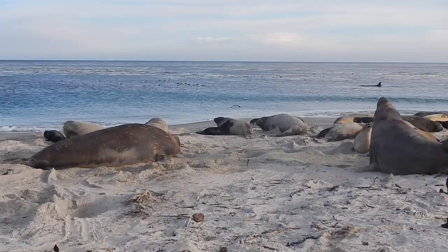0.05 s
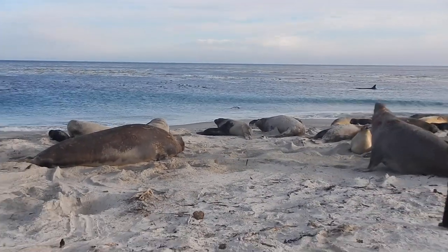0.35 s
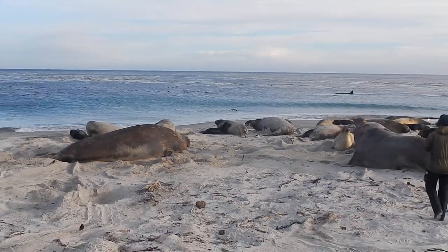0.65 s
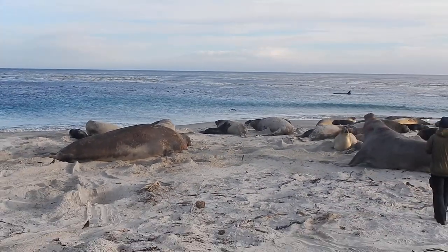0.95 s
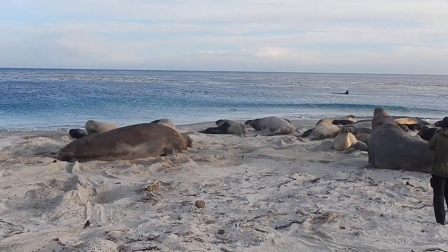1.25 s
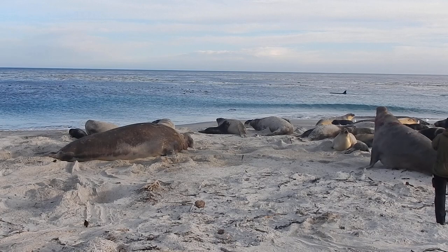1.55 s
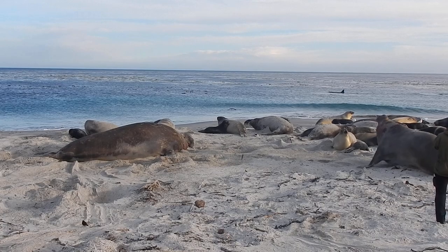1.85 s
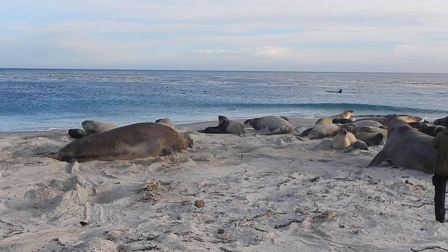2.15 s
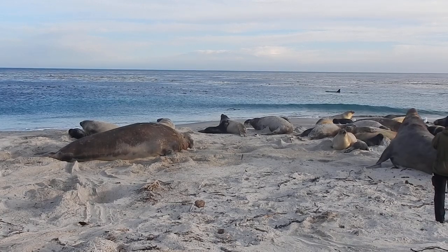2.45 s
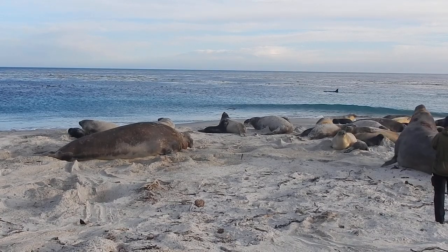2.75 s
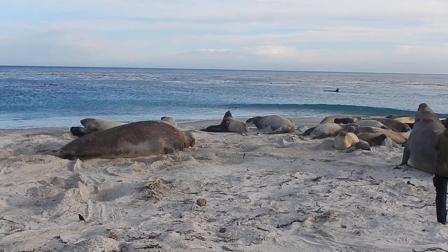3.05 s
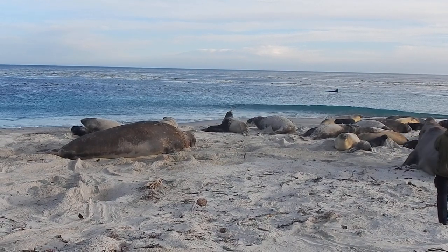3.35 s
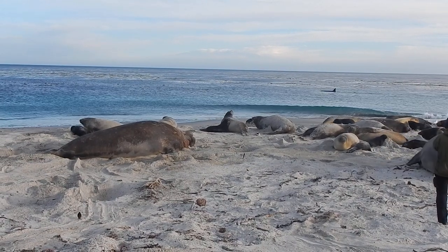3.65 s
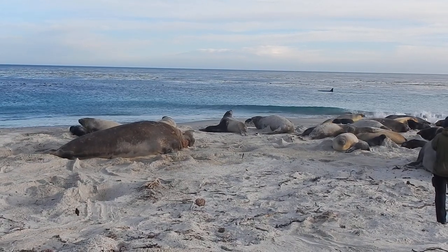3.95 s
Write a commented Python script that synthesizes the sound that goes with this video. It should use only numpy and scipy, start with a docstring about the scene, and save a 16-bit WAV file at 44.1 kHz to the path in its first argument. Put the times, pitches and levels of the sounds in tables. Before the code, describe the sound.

A nearby elephant seal snorts a run of rattling pulses from about 0.3 seconds, then roars roughly from 1.2 to 2.2 seconds, a low clear tone emerging near the end. From 2.5 seconds, farther seals rasp and give two runs of low, rising knocking calls, with small gritty crunches around 3.5 seconds. Soft surf hisses throughout, swelling at the close, and wind buffets the microphone.

```python
"""An elephant seal on an open beach snorts a run of rattling pulses, then roars. Loose throat tissue
flaps unevenly and chops the breath; chest, throat and mouth filter this source, over a low voiced
tone that comes out clean near the end. Farther seals rasp and give low knocking calls, among small
crunches. Surf hisses behind and wind buffets the microphone."""
import sys
import numpy as np
from scipy import signal
from scipy.fft import rfft, irfft
from scipy.io import wavfile
from scipy.ndimage import uniform_filter1d

SR = 44100
rng = np.random.default_rng(int(sys.argv[2]) if len(sys.argv) > 2 else 0)


def store_wav(level_fs):
    """Save 16-bit WAV to argv[1]."""
    pcm = np.round(np.clip(np.atleast_2d(level_fs), -1, 1) * 32767)
    wavfile.write(sys.argv[1], SR, pcm.T.astype(np.int16))


N = 176400
T = np.arange(N) / SR


def from_db(db):
    """Amplitude ratio of a level in decibels."""
    return 10 ** (np.asarray(db) / 20)


def rms_one(x):
    """Normalisation to unit rms."""
    return x / np.sqrt(np.mean(x ** 2) + 1e-20)


def even(x):
    """Division by the running rms holds the level steady over about 40 ms."""
    return x / np.sqrt(np.abs(uniform_filter1d(x * x, size=1800)) + 1e-9)


def in_time(rows):
    """Linear interpolation of each column against the first, t/s."""
    times, *columns = np.transpose(rows)
    return [np.interp(T, times, column) for column in columns]


def swells(rows, edge_s):
    """Sum of trapezoidal envelopes, one per row."""
    return sum(from_db(db) * np.clip(np.minimum(T - s, s + length - T) / edge_s + .5, 0, 1)
               for s, length, db in rows)


def add(out, start_s, x):
    """Superposition of a short sound from a given instant."""
    i = int(start_s * SR)
    out[i:i + len(x)] += x[:N - i]


def drift(hz):
    """Random fluctuation: low-passed noise of unit rms."""
    r = np.exp(-2 * np.pi * hz / SR)
    return rms_one(signal.lfilter([1], [1, -2 * r, r * r], rng.standard_normal(N + SR))[SR:])


def colour(x, spectrum):
    """Spectral shaping by a gain curve interpolated in log frequency."""
    hz, db = np.transpose(spectrum)
    f = np.arange(N // 2 + 1) * SR / N
    return irfft(rfft(x) * from_db(np.interp(np.log(f + 1), np.log(hz), db)), N)


def noise(spectrum, correlation):
    """Partially coherent stereo noise of unit rms."""
    mid, side = colour(rng.standard_normal((2, N)), spectrum)
    return rms_one(np.sqrt(1 + correlation) * mid + np.sqrt(1 - correlation) * side * [[1], [-1]])


def soften(x, hz):
    """Low-pass filtering, as by soft flesh."""
    return signal.sosfilt(signal.butter(4, hz, fs=SR, output="sos"), x)


def resonate(x, hz, width_hz):
    """A damped resonator with unit peak gain."""
    r = np.exp(-np.pi * width_hz / SR)
    poles = [1, -2 * r * np.cos(2 * np.pi * hz / SR), r * r]
    return signal.lfilter(np.array([1, 0, -1]) * (1 - r * r) / 2, poles, x + 1e-18)


def bank(x, modes):
    """Modal superposition with alternating signs."""
    return sum((-1) ** k * from_db(db) * resonate(x, hz, width)
               for k, (hz, width, db) in enumerate(modes))


def steep_bank(x, modes):
    """Cascaded resonator pairs in parallel leave deep valleys between modes; unit rms."""
    return rms_one(sum(from_db(db) * resonate(resonate(x, hz, width), hz, width)
                       for hz, width, db in modes))


def formant(x, path, width_hz):
    """A moving resonance by heterodyning: shift down, low-pass, shift back; unit rms."""
    carrier = np.exp(2j * np.pi * np.cumsum(in_time(path)[0]) / SR)
    r = np.exp(-np.pi * width_hz / SR)
    return rms_one((signal.lfilter([1], [1, -2 * r, r * r], x / carrier) * carrier).real)


def snap(grit, fade_s):
    """Impulsive excitation, as when tissue slaps shut: a click with a decaying noise tail."""
    t = T[:SR // 10]
    return (t == 0) + grit * rng.standard_normal(len(t)) * np.exp(-t / fade_s)


def pop(hz, ring_s):
    """Damped oscillation of a cavity whose pitch rises as it opens."""
    t = T[:SR // 10]
    pitch = hz * (1 - 0.067 * np.exp(-t / 0.0024))
    return np.sin(2 * np.pi * np.cumsum(pitch) / SR) * np.exp(-t / ring_s)


def flaps(hz):
    """Irregular oscillation of tissue: a click each cycle, and an opening that closes exponentially."""
    jitter, stumble, spread_db, close_s = .13, .2, 1, 0.0053
    rate = hz * np.exp(jitter * drift(60) + stumble * drift(150.9))
    cycles = np.floor(np.cumsum(rate) / SR)
    clicks = np.diff(cycles, prepend=0) * from_db(spread_db * np.clip(rng.standard_normal(N), -2, 2))
    opening = signal.lfilter([1], [1, -np.exp(-1 / (close_s * SR))], clicks)
    return rms_one(clicks), rms_one(opening)


def beach(x, pan_db):
    """Scattering from sand and bodies adds a short tail, different in each ear, to the direct sound."""
    # scattering response: f/Hz, gain/dB
    spectrum = [(100, -26), (500, 7.5), (1000, -9.5), (2200, 7.5), (4300, 5), (8000, 18)]
    decay_s = 0.013
    tail = colour(rng.standard_normal((2, N)) * np.exp(-T / decay_s), spectrum)[:, :SR // 4]
    tail = tail / np.sqrt(decay_s * SR / 2)
    scattered = from_db(-13.5) * signal.fftconvolve(x[None], tail, axes=1)[:, :N]
    return (x + scattered) * from_db(np.array([[1], [-1]]) * pan_db / 2)


def surf():
    """Small waves wash the shore as amplitude-modulated noise, over a faint steady hiss."""
    # spectra of wash and hiss: f/Hz, relative level/dB
    wash_spectrum = [(60, 5.5), (250, 4), (500, -7), (1000, -10.5), (2200, -15.5), (3200, -21),
                     (4300, -15.5), (5300, -28.5), (6300, -25), (7500, -43.5), (9500, -46), (15000, -44)]
    hiss_spectrum = [(1000, -14), (7000, 1), (11000, -2), (15500, -5)]
    # the wash ebbs, then swells: t/s, relative level/dB
    ebb = [(0, -50.5), (.3, -51.5), (.9, -53.5)]
    swell = [(2.16, -56), (2.472, -55.5), (2.876, -56), (3.368, -57), (3.446, -49.5), (3.574, -46),
             (3.614, -51.5), (4.0, -48)]
    wash_db = 14.5 + in_time(list(ebb) + list(swell))[0] + 2 * drift(45)
    wash = from_db(wash_db) * noise(wash_spectrum, correlation=0.78)
    return wash + from_db(-67) * noise(hiss_spectrum, correlation=0.067)


def wind():
    """Turbulent pressure on the microphone: a lumpy rumble with short, harder buffets."""
    # spectra of rumble and buffets: f/Hz, relative level/dB
    rumble_spectrum = [(20, -13.5), (55, 0), (115, 1), (180, -5), (250, -17.5), (400, -32.5), (800, -40),
                       (3000, -84)]
    buffet_spectrum = [(30, -70), (80, 0.5), (150, -1.5), (220, 0.5), (350, -11.5), (700, -28), (3000, -72)]
    # rumble envelope: t/s, relative level/dB
    gusts = [(0.0, -16.5), (0.14, -37.5), (0.18, -18.5), (0.27, -33), (0.33, -23.5), (0.5, -34.5),
             (0.61, -25.5), (0.85, -49), (0.91, -26), (1.06, -40), (1.11, -26), (1.63, -36), (1.69, -26),
             (1.79, -39), (2.06, -25), (2.13, -35.5), (2.21, -24), (2.61, -41), (2.68, -26.5),
             (2.73, -37.5), (3.73, -33.5), (4.0, -36)]
    # buffets: t/s, duration/s, level/dB
    buffets = [(.165, 0.036, -18), (.36, 0.02, -21.5), (.94, 0.0097, -24), (1.11, 0.034, -22),
               (2.185, 0.059, -22.5), (2.66, 0.035, -33.5), (2.858, 0.011, -27), (3.19, 0.03, -32.5),
               (3.705, 0.011, -23)]
    rumble = from_db(4 + in_time(gusts)[0] + 2 * drift(35)) * noise(rumble_spectrum, correlation=.1)
    return rumble + swells(buffets, edge_s=0.0044) * even(noise(buffet_spectrum, correlation=0.56))


def crunches():
    """Impulses ring damped resonances: gritty ticks, probably sand and dry weed under a moving seal."""
    # ticks: t/s, relative level/dB, f/Hz
    ticks = [(2.876, -32.5, 4300), (3.459, -26.5, 4300), (3.588, -26.5, 4200), (3.611, -26, 3830),
             (3.67, -26, 4300), (3.691, -23, 2620), (3.748, -28, 4200), (3.773, -25.5, 3880),
             (3.784, -23.5, 2720)]
    out = np.zeros(N)
    for s, db, hz in ticks:
        add(out, s, from_db(db + 19.5) * resonate(snap(grit=0.34, fade_s=0.0024), hz, width_hz=540))
    return soften(out, hz=5430)


def far_knocks():
    """Impulses excite throat, chest and mouth of farther seals, which ring on as the calls rise."""
    # knocks: t/s, relative level/dB, throat f/Hz, overtone gain/dB
    knocks = [(2.713, -24.5, 313, 6), (2.72, -23.5, 294, 0), (2.739, -19, 340, -23), (2.761, -17, 352, -26),
              (2.785, -19, 383, -9), (2.81, -21, 400, -0.5), (2.836, -25.5, 386, -15), (2.93, -34, 470, 6),
              (3.001, -33.5, 520, 1), (3.072, -36, 516, 7), (3.479, -26, 284, 9), (3.486, -21.5, 278, -2),
              (3.502, -24.5, 280, 4), (3.511, -23, 292, 0), (3.522, -20, 280, -4), (3.536, -30, 300, 13),
              (3.551, -24, 313, 0), (3.568, -23, 323, 9), (3.588, -15, 325, -18), (3.61, -21.5, 363, 3),
              (3.638, -21.5, 394, -1), (3.660, -26, 450, -7), (3.672, -28.5, 443, 11), (3.69, -42, 467, 23),
              (3.712, -19, 458, 0.5), (3.745, -28, 460, 9), (3.761, -25, 447, 3), (3.786, -38, 458, 6),
              (3.827, -34.5, 497, 19), (3.862, -38, 490, 3)]
    # modes of the overtones and the dull thump: f/Hz, bandwidth/Hz, gain/dB
    overtone_modes = [(1070, 130, -10), (1854, 190, -4.5), (1990, 800, -10), (4200, 410, -31)]
    thump_modes = [(240, 260, 0)]
    # mouth resonance: t/s, f/Hz
    mouth_path = [(2.72, 950), (2.81, 1054), (2.92, 1050), (3.08, 1130), (3.48, 900)]
    out, hits = np.zeros(N), np.zeros(N)
    for s, db, hz, overtones_db in knocks:
        hit = from_db(db + 35.5) * snap(grit=0.099, fade_s=0.005)
        throat = soften(resonate(hit, hz, width_hz=66) + resonate(hit, hz, width_hz=13), hz=900)
        chest = from_db(3.5) * resonate(hit, hz=232, width_hz=18)
        thump = bank(soften(hit, hz=396), thump_modes)
        overtones = from_db(overtones_db) * .5 * bank(hit, overtone_modes)
        add(out, s, throat + chest + thump + overtones)
        add(hits, s, hit)
    hum = from_db(-60) * formant(hits, mouth_path, width_hz=60)
    return soften(out, hz=3200) + hum


def far_rasps():
    """Flapping tissue modulates the breath noise of farther seals, and fixed formants filter it."""
    # rasps: t/s, duration/s, level/dB
    rasps = [(2.465, 0.088, -39.5), (2.7, 0.15, -45), (3.47, 0.152, -44.5), (3.66, 0.28, -47)]
    # formants: f/Hz, bandwidth/Hz, gain/dB
    modes = [(970, 420, 4), (1830, 320, 2), (4200, 460, -8.5)]
    _, opening = flaps(hz=110)
    return swells(rasps, edge_s=0.057) * steep_bank(opening * rng.standard_normal(N), modes)


def snorts():
    """Impulse responses of nose and throat: each pulse rings both inside a puff of escaping air."""
    # pulses: t/s, relative level/dB, nasal f/Hz, throat gain/dB, air gain/dB
    pulses = [(.329, -15.5, 1356, -14, -4.5), (.354, -13, 1436, -26, -9.5),
              (.412, -7.5, 1320, -12.5, -11.5), (0.432, -12, 1310, -10, -4), (0.45, -32, 1280, -10, 8.5),
              (.496, -18, 1160, -1.5, -3), (0.512, -22, 1176, -5, -1), (0.541, -26, 1120, 12, 6),
              (0.581, -22.5, 1060, 9.5, 10), (.628, -13.5, 1140, -11, -2.5), (0.685, -16, 1100, 2.5, 1.5),
              (0.737, -16.5, 1150, -1.5, 0), (0.798, -9, 1180, -14, -6), (.848, -26, 1550, -25, -1.5),
              (.877, -27.5, 1470, -14, -1), (0.901, -26, 1480, -14, 1.5), (0.991, -19.5, 1090, -26, -11),
              (1.004, -19, 944, -2, -16), (1.010, -12, 1000, -25, -23), (1.032, -17, 1010, -4.5, -3),
              (1.034, -18, 990, -37, -19), (1.041, -14, 930, -19.5, -36), (1.059, -11, 1107, -32, -26),
              (1.119, -26, 1080, -20, -3.5), (1.170, -19, 2110, -11, -2), (1.204, -19, 1970, -15, -0.5),
              (1.220, -25, 1600, -15, -14), (1.232, -12, 1140, -6, -25), (1.243, -13, 986, -10, -12)]
    # upper resonances: f/Hz, bandwidth/Hz, gain/dB
    overtone_modes = [(1528, 83, 5.5), (2130, 230, -2.5), (4300, 200, -5.5), (6250, 720, -25)]
    # escaping air: f/Hz, relative level/dB
    air_spectrum = [(200, 3), (500, 0), (800, -4.5), (1200, 7.5), (2300, -10), (3200, -5.5), (4300, 6.5),
                    (5200, -12), (6400, -13), (8500, -41), (14000, -45)]
    rise_s, fade_s = 0.0038, 0.0033
    rings, puffs = np.zeros(N), np.zeros(N)
    for s, db, hz, throat_db, air_db in pulses:
        nose = from_db(-1) * pop(hz, ring_s=0.0043)
        overtones = from_db(21.5) * bank(snap(grit=0.094, fade_s=0.0019), overtone_modes)
        throat = from_db(throat_db) * pop(hz=547, ring_s=.004)
        add(rings, s, from_db(db) * (nose + overtones + throat))
        puffs += from_db(db + air_db) * np.exp(-np.maximum((s - T) / rise_s, (T - s) / fade_s))
    _, opening = flaps(hz=140)
    air = rms_one(colour(rng.standard_normal(N) * (.5 + opening), air_spectrum))
    return soften(rings, hz=8100) + from_db(-4) * puffs * air


def span(rows):
    """Rectangular window from the first row's time to the last's."""
    return (T > rows[0][0]) * (T < rows[-1][0])


def voice(opening):
    """The roar's voiced tone: a harmonic series, rough where the flaps modulate its amplitude."""
    # contour: t/s, f/Hz, relative level/dB, roughness (0-1)
    contour = [(1.28, 169.3, -38, 0.72), (1.32, 176.1, -24, 0.13), (1.42, 178.9, -25.5, 0.26),
               (1.5, 205.3, -40, 0.56), (1.7, 208.2, -27, 0.36), (1.82, 219.3, -29.5, 0.15),
               (1.87, 205.5, -18.5, 0.03), (1.94, 197.4, -15.5, 0), (1.975, 172.7, -16, 0),
               (2.005, 172, -16, 0.07), (2.03, 171, -30, 0.32)]
    # harmonics from the fundamental up: gain/dB
    harmonics = [3.5, -7, -2, -3, -10, -17]
    # overtone emphasis: t/s, gain/dB
    brightness = [(1.3, 0), (1.8, 1), (1.87, 3), (1.95, -3.5), (1.98, -33)]
    hz, db, roughness = in_time(contour)
    wobble = 0.0123 * (1 + roughness) * drift(55)
    phase = 2 * np.pi * np.cumsum(hz * (1 + wobble)) / SR
    bright = from_db(in_time(brightness)[0])
    tone = sum(from_db(h) * (bright if k else 1) * np.sin((k + 1) * phase + rng.uniform(0, 2 * np.pi))
               for k, h in enumerate(harmonics))
    return tone * from_db(db) * (1 + roughness * (opening - opening.mean())) * span(contour)


def roar():
    """Source and filter: flaps and the air they chop drive chest, throat, mouth and a bright rasp."""
    # envelopes: t/s, then relative level/dB of throat, mouth and rasp
    levels = [(1.2, -47, -44, -57), (1.258, -23, -20.5, -25.5), (1.34, -17.5, -18, -25.5),
              (1.396, -20, -19, -21.5), (1.482, -15.5, -22, -20), (1.51, -22.5, -25, -27.5),
              (1.542, -17, -19.5, -25.5), (1.67, -21, -25, -28.5), (1.706, -14.5, -22.5, -24),
              (1.732, -17.5, -20.5, -29), (1.78, -20, -26, -31.5), (1.89, -19.5, -24, -30),
              (1.994, -18, -29, -29.5), (2.064, -13.5, -24.5, -30.5), (2.11, -30.5, -34, -28),
              (2.17, -60, -65, -68)]
    # opening flutter, narrow core of the throat resonance, top hiss: t/s, relative level/dB
    flutter_level = [(1.06, -54), (1.09, -37.5), (1.13, -39), (1.19, -46), (1.24, -60)]
    core_level = [(1.25, -11), (1.42, -11), (1.48, -2), (1.7, -11), (1.8, -18), (1.88, -5.5), (2.05, -13)]
    hiss_level = [(1.2, -71), (1.27, -41.5), (1.44, -35), (1.6, -41), (1.72, -37), (1.8, -42), (1.9, -34),
                  (2.11, -42.5), (2.17, -82)]
    # nominal flap rate and two moving formants: t/s, f/Hz
    flap_rate = [(1.08, 100.6), (1.21, 71.94), (1.26, 120.3), (1.45, 125), (1.56, 95.25), (1.7, 83.68),
                 (1.8, 65.8), (1.86, 103), (1.95, 98.8), (2.03, 110.3), (2.1, 91.84)]
    throat_path = [(1.25, 529), (1.48, 494), (1.6, 504), (1.8, 476), (1.9, 552), (2.08, 524)]
    mouth_path = [(1.25, 955), (1.4, 932), (1.56, 887), (1.75, 865), (2.08, 856.7)]
    # fixed resonances: f/Hz, bandwidth/Hz, gain/dB
    chest_modes = [(211.5, 134, 0.5), (302, 113, 0), (435, 155, -4.5)]
    upper_modes = [(1210, 110, 3), (1660, 370, 4), (2180, 290, 3.5), (2680, 650, -3)]
    rasp_modes = [(3760, 280, 5.5), (4180, 456, 8), (6100, 270, -29)]
    # top hiss: f/Hz, gain/dB
    hiss_spectrum = [(3000, -48), (4800, -37), (5600, 9), (6500, 2.5), (7200, -6.5), (8200, -12.5),
                     (9200, -19.5), (13500, -25.5), (15000, -46)]
    clicks, opening = flaps(in_time(flap_rate)[0])
    air = opening * rng.standard_normal(N)
    source, breathy = clicks + 0.98 * air, clicks + 1.35 * air
    flutter = from_db(in_time(flutter_level)[0]) * span(flutter_level)
    throat_gain, mouth_gain, rasp_gain = [from_db(db) * span(levels) + flutter for db in in_time(levels)]
    chest = throat_gain * from_db(-4.5) * even(steep_bank(source, chest_modes))
    throat = throat_gain * from_db(-4.5) * even(formant(source, throat_path, width_hz=280))
    core_gain = throat_gain * from_db(in_time(core_level)[0])
    core = core_gain * even(formant(source, throat_path, width_hz=51))
    mouth = mouth_gain * from_db(2.5) * even(formant(source, mouth_path, width_hz=145))
    upper = np.sqrt(mouth_gain * rasp_gain) * from_db(-1) * even(steep_bank(source, upper_modes))
    rasp = rasp_gain * from_db(-1) * even(steep_bank(breathy, rasp_modes))
    hiss = span(levels) * from_db(in_time(hiss_level)[0]) * even(colour(breathy, hiss_spectrum))
    return soften(chest + throat + core + mouth + upper + rasp + hiss + voice(opening), hz=11900)


def scene():
    """Superposition of the near seal, the colony, surf and wind."""
    seal = beach(snorts() + roar(), pan_db=-1.5)
    colony = beach(far_knocks() + far_rasps() + crunches(), pan_db=-1.7)
    return seal + colony + surf() + wind()


def record(dry):
    """Microphone response: three treble notches, soft saturation of the peaks and a steep low-pass."""
    # notches: f/Hz, bandwidth/Hz
    notches = [(2490, 73), (3170, 500), (5000, 224)]
    ceiling, cutoff_hz = .9, 15800
    for hz, width_hz in notches:
        dry = signal.lfilter(*signal.iirnotch(hz, hz / width_hz, fs=SR), dry)
    rounded = ceiling * np.tanh(np.abs(dry / ceiling) ** 4) ** .25 * np.sign(dry)
    return signal.sosfilt(signal.ellip(10, .1, 80, cutoff_hz, fs=SR, output="sos"), rounded)


dry = scene()
out = record(dry)
store_wav(out)
```